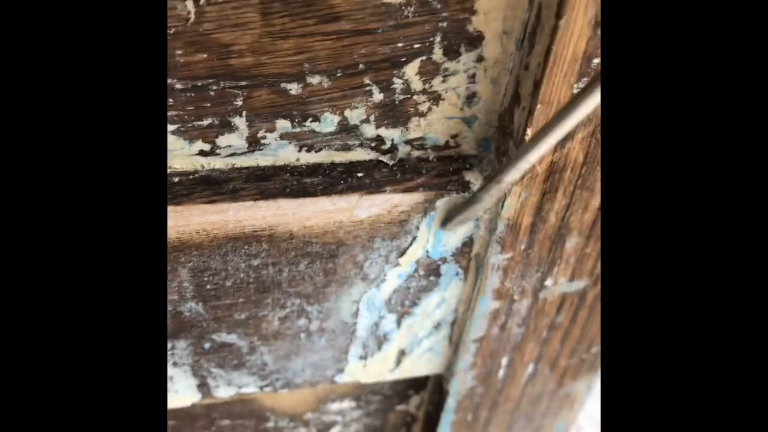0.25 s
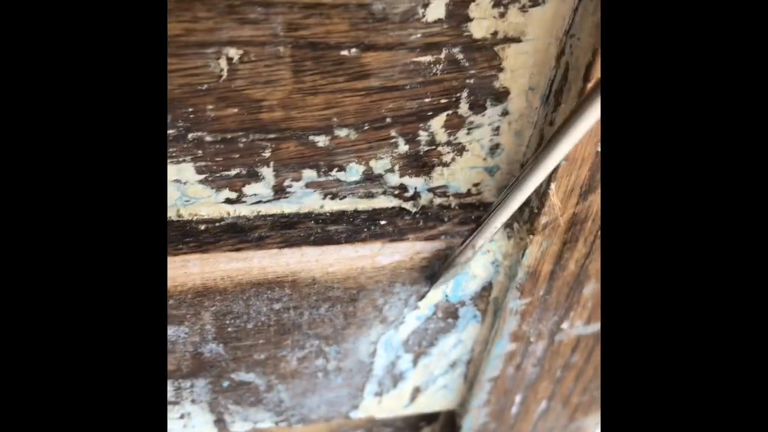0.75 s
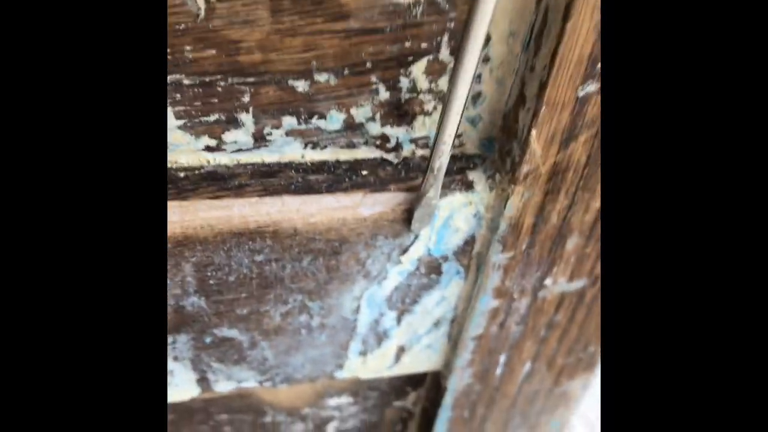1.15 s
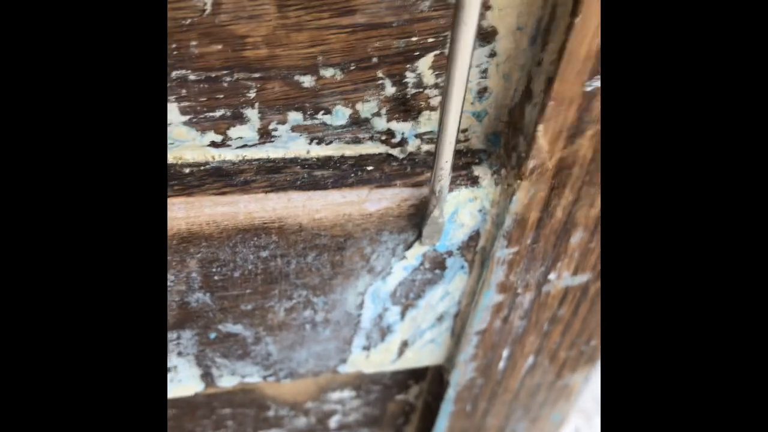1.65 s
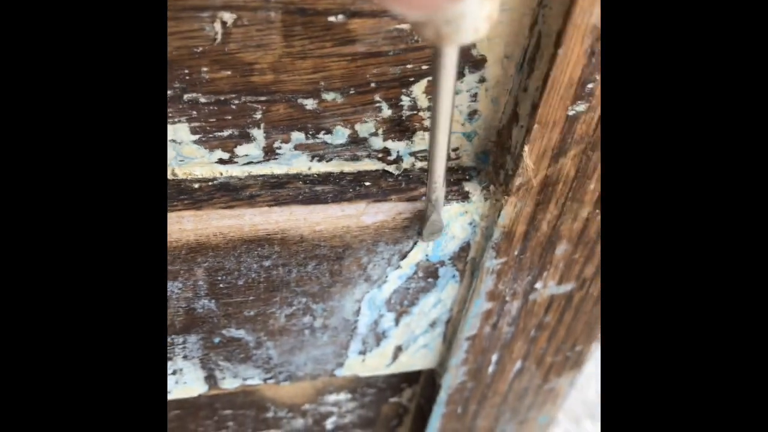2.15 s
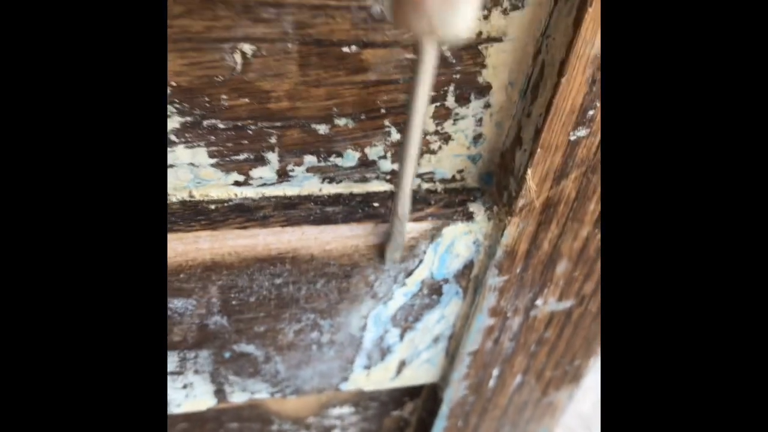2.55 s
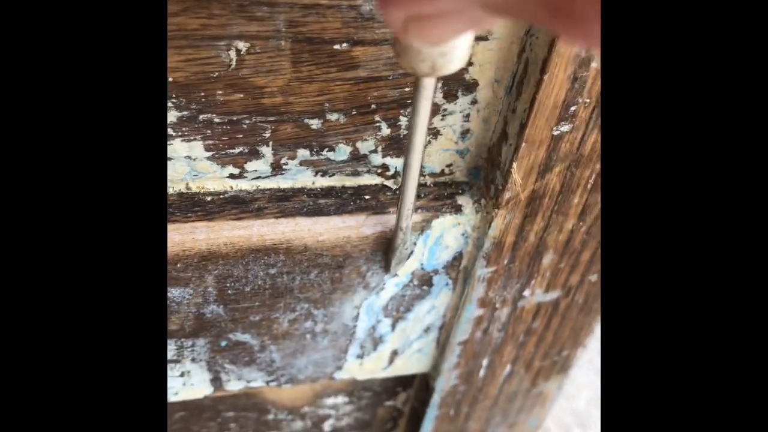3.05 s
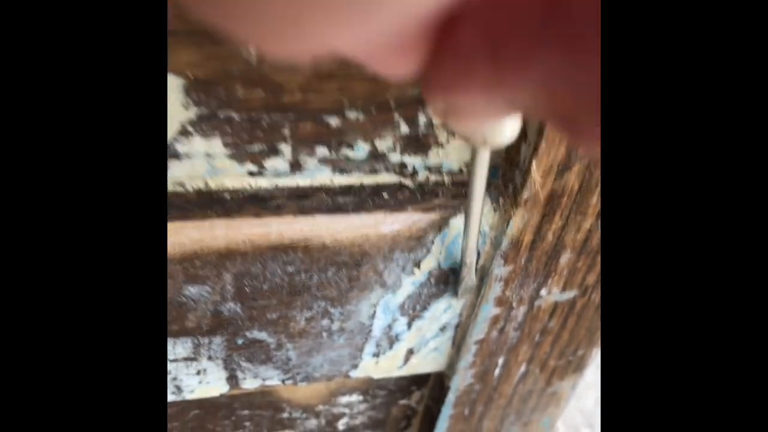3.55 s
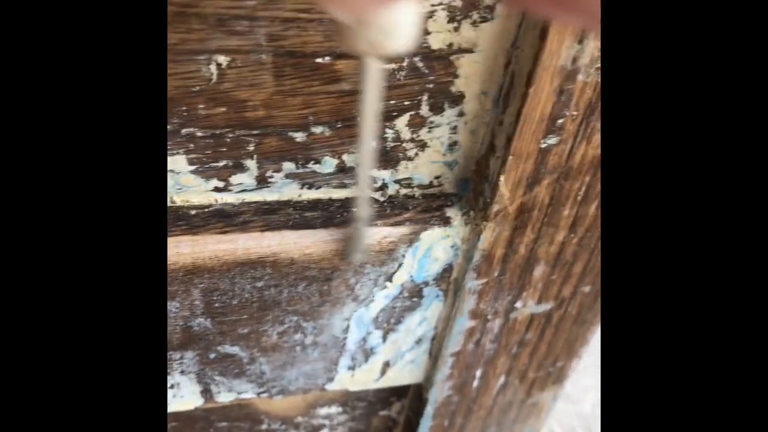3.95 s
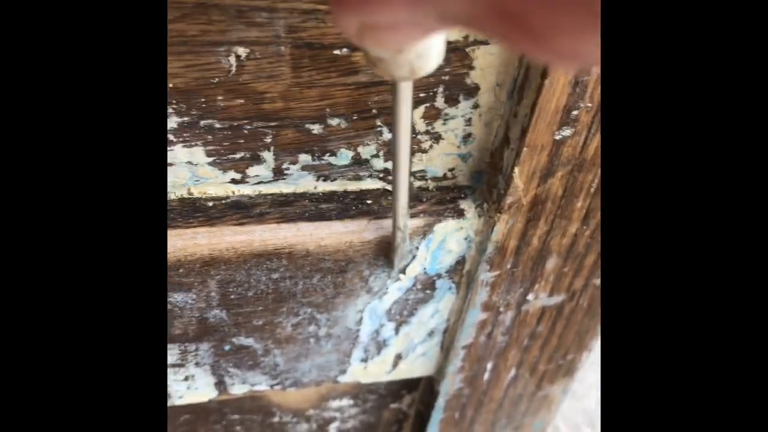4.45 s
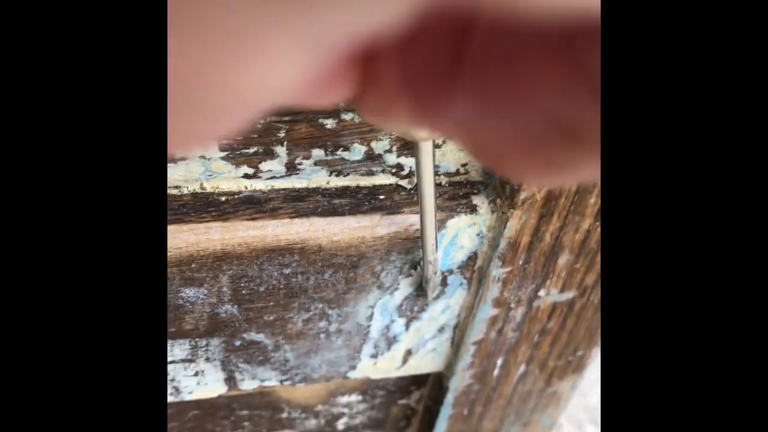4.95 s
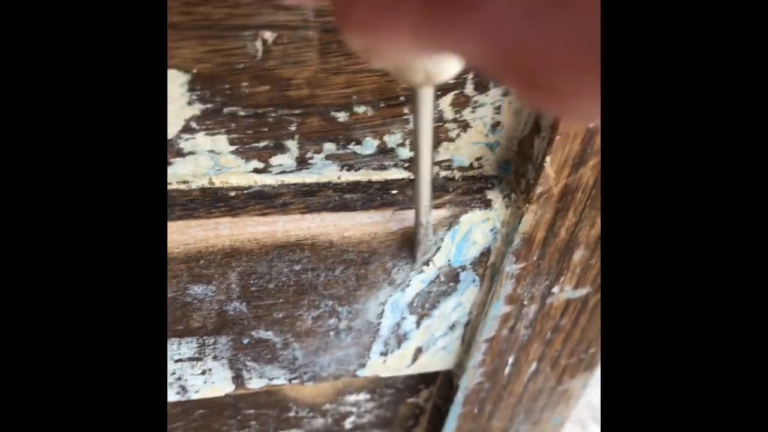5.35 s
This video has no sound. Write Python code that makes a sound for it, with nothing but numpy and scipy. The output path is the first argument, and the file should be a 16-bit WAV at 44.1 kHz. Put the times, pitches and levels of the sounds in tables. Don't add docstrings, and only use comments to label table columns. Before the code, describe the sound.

A steel point works old paint out of a wooden panel's corner, heard very close and dry with only a trace of small-room reflection. Underneath are a very faint, unsteady low motor hum, soft hiss, thin distant insects and barely audible bird chirps, the clearest near 5.1 s. At first there is a fading scrape, then tiny flake snaps at 0.3 and 0.4 s. Soft low wooden knocks come at 0.5, 0.6, 1.0 and 1.3 s, between short faint rasps; harder knocks land at 2.1 and 2.3 s, the last with a clear tick. Brittle snaps follow at 2.4 s, then lighter scratching. Around 3.4 s a thick flake breaks in two very loud, sharp cracks, the second strongest, with a soft hand bump. From 3.6 s, irregular gritty strokes and crisp snaps continue, with small pressure thumps, until a strong snap at 5.5 s and a brief fading scrape.

```python
import sys
import numpy as np
from scipy import signal
from scipy.fft import irfft
from scipy.io import wavfile

SR = 44100
rng = np.random.default_rng(int(sys.argv[2]) if len(sys.argv) > 2 else 0)


def int16_out(signal):
    q = np.round(np.clip(np.atleast_2d(signal).T, -1, 1) * 32767)
    wavfile.write(sys.argv[1], SR, q.astype(np.int16))


def gain_from_decibels(decibels):
    exponent = np.asarray(decibels, float) / 20
    return 10 ** exponent


N = 247401

# centre_hz, density_db_per_hz
ROOM_SPECTRUM = [(30, -45.5), (45, -12), (65, -4), (95, -5.5), (140, -7), (230, -9.5), (400, -16),
                 (600, -21), (1000, -26.5), (2000, -30), (4000, -34.5), (6200, -37), (9500, -39),
                 (15500, -42.5)]
# time_s, level_db
MOTOR_LOAD = [(0.0, -54.5), (0.6, -61), (0.87, -72), (1.05, -63), (1.35, -70), (1.6, -73.5), (1.97, -56.5),
              (2.28, -67), (2.58, -61), (2.86, -68.5), (3.2, -62), (3.42, -55.5), (3.7, -67.5), (4.08, -69),
              (4.3, -61), (4.9, -64), (5.15, -54.5), (5.61, -60.5)]
# start_s, length_s, first_hz, last_hz, level_db
CHIRPS = [
    (.315, .06, 2880, 2950, -73),
    (1.075, .075, 3040, 3100, -79),
    (3.085, .07, 3060, 3110, -77),
    (4.33, .045, 3070, 3120, -73),
    (5.066, .052, 2980, 3260, -63),
]
# start_s, level_db, softness_s
PUSHES = [(.01, -47.5, 0.003), (1.053, -48, 0.0037), (1.301, -47.5, 0.017), (1.708, -57.5, 0.0026),
          (1.82, -44, 0.0075), (2.011, -51.5, 0.0014), (3.187, -49.5, 0.00069), (3.215, -48.5, 0.0029),
          (3.416, -36, 0.0016), (3.446, -47, 0.0011), (3.472, -45, 0.0016), (3.509, -53.5, 0.0017),
          (4.041, -51, 0.002), (4.066, -54, 0.0014), (4.163, -50.5, 0.001), (4.189, -59, 0.0016),
          (4.879, -44.5, 0.0026), (4.905, -53.5, 0.0003), (4.937, -47, 0.00034), (4.995, -56, 0.00045),
          (4.967, -56, 0.00064), (5.515, -45.5, 0.00061), (4.99, -50.5, 0.0028), (5.579, -53, 0.0014)]
# tick_s, thud_db, centre_hz, tick_above_thud_db
KNOCKS = [
    (0.5302, -32.5, 410, -22.5),
    (.634, -30, 435, -19.5),
    (0.9588, -25, 457, -14),
    (1.279, -29, 447, -16),
    (2.1026, -21.5, 485, -16.5),
    (2.2859, -17, 485, -9.5),
]
# pitch_hz, level_db, fade_s
TICK_RINGS = [(1320, 8.5, 0.00035), (1540, -6, 0.001), (2200, -10, 0.002), (4000, -7, 0.00085),
              (5700, -32, 0.00054)]
# pitch_hz, level_db, t60_s
PANEL_MODES = [(153, -3, 0.069), (225.8, 3.5, 0.17), (274, 8, 0.042), (302, 6.5, 0.029), (394.4, -7, 0.039),
               (493.4, 2.5, 0.069), (592, -1, 0.041), (755, -5, 0.096), (938, -2.5, 0.035),
               (1054, -5.5, 0.063), (1215, -33, 0.15), (1433, -6.5, 0.034)]
# pitch_hz, level_db, t60_s
SHANK_MODES = [(1137, 11.5, 0.0096), (2085, 8, 0.013), (2400, -4.5, 0.041), (2950, 0, 0.015),
               (3345, -4, 0.032), (4440, 3, 0.013)]
# pitch_hz, level_db, t60_s
TIP_MODES = [(5330, -8.5, 0.0062), (5730, 4.5, 0.0021), (8110, 2.5, 0.0065), (9300, 3, 0.001),
             (12190, -3, 0.006), (14360, 3, 0.0015)]
# time_s, peak_db, panel_above_peak_db, dullness_0_1
SNAPS = [(0.26, -47, -16, 0.26), (0.431, -46.5, -31, 0.37), (1.1857, -59, 5.5, 0.7),
         (1.6231, -52, -30, 0.76), (1.9748, -42, -3, 0.66), (1.9959, -50, -15, 0), (2.358, -36, -2.5, 0.5),
         (2.3694, -37.5, 3, 0.17), (2.373, -45, -9, 0.4), (2.6114, -46.5, -3, 0.46), (2.721, -49.5, -17, 0),
         (3.1867, -55, -12, 0.7), (3.24, -54, -16, 0.05), (3.3536, -39, -18, 0), (3.6641, -45.5, -11, 0.1),
         (3.677, -38, -17, 0.42), (3.7167, -45.5, 3, 0.6), (3.7289, -36, -4.5, 0.45),
         (3.7992, -36, 2.5, 0.53), (3.9474, -35.5, -29, 0.5), (4.2074, -39.5, -4.5, 0.32),
         (4.3012, -37, -0.5, 0.19), (4.4416, -46, -9.5, 0.34), (4.5978, -51, -27, 0.1),
         (4.8745, -50, -10.5, 0.35), (4.9187, -38, -27, 0), (5.2874, -45.5, -10.5, 0.28),
         (5.3288, -35, -2.5, 0.46), (5.48, -58, -10, 0.1), (5.5065, -29, -6, 0.2)]
# time_s, peak_db, panel_above_peak_db, dullness_0_1, click_gain
BREAKS = [
    (3.369, -11, -16.5, .25, .4),
    (3.41, -8, -15.5, 0.31, 2.4),
]
# start_s, length_s, grit_db, panel_above_grit_db
DIGS = [
    (3.3669, 0.0024, -40, -8.5),
    (3.4047, 0.0051, -30, -15),
]
# start_s, length_s, grit_db, panel_above_grit_db
BUILDING = [(0.776, 0.026, -75, 7), (1.067, 0.12, -91.5, 20), (1.228, 0.064, -70.5, 16),
            (2.116, 0.054, -68, 12.5), (2.353, 0.041, -60, 15.5), (2.517, 0.082, -69, 13),
            (3.604, 0.044, -68.5, 3), (3.707, 0.07, -63.5, 16), (4.63, 0.079, -83, 17.5),
            (5.109, 0.048, -64, 5.5), (5.283, 0.041, -63.5, 10), (5.431, 0.026, -70, 7), ]
# start_s, length_s, grit_db, panel_above_grit_db
EVEN = [(0.268, 0.042, -76.5, 21), (0.425, 0.045, -78.5, 20.5), (0.913, 0.08, -76.5, 13),
        (1.63, 0.085, -77, 16.5), (1.76, 0.025, -81, 20), (2.71, 0.038, -67, 5.5), (2.899, 0.03, -69.5, 12),
        (3.374, 0.019, -47, 10.5), (3.665, 0.028, -65, 14.5), (3.898, 0.044, -71, 0),
        (3.951, 0.045, -61, 12.5), (4.222, 0.047, -81.5, 19.5), (4.303, 0.023, -76, 25),
        (4.587, 0.037, -72.5, 14.5), (4.731, 0.12, -74, 13.5), (4.909, 0.051, -59, 14),
        (5.478, 0.059, -60.5, 14), (5.55, 0.039, -89, 23)]
# start_s, length_s, grit_db, panel_above_grit_db
FADING = [(0, 0.052, -87.5, 26.5), (1.802, 0.052, -69.5, 5.5), (1.978, 0.024, -77, 21),
          (2.014, 0.098, -72.5, 3), (2.416, 0.023, -77.5, 17.5), (2.602, 0.026, -72, 12),
          (2.754, 0.04, -74.5, 7), (3.357, 0.027, -65, 14.5), (3.408, 0.07, -66.5, 26.5),
          (3.796, 0.05, -70.5, 17.5), (4.209, 0.017, -60, 14.5), (4.407, 0.12, -76.5, 10),
          (4.877, 0.028, -77, 24.5), (5.174, 0.053, -81.5, 19), (5.326, 0.024, -65, 24.5)]

UNEVEN_DB = 2.5


def rms_one(x):
    return x / np.sqrt(np.mean(x ** 2) + 1e-20)


def drift(rate_hz):
    r = np.exp(-2 * np.pi * rate_hz / SR)
    once = signal.lfilter([1], [1, -r], rng.standard_normal(N + SR))
    twice = signal.lfilter([1], [1, -r], once)
    return rms_one(twice[SR:])


def band(x, low_hz, high_hz):
    return signal.sosfilt(signal.butter(2, [low_hz, high_hz], "band", fs=SR, output="sos"), x)


def body(force, modes, uneven_db):
    out, energy = np.zeros(N), 0
    for k, (hz, level_db, t60_s) in enumerate(modes):
        r = gain_from_decibels(-60 / (t60_s * SR))
        w = 2 * np.pi * hz / SR
        coupling = gain_from_decibels(level_db + uneven_db * drift(37)) * (-1) ** k
        resonator = [1, -2 * r * np.cos(w), r * r]
        out += signal.lfilter([0, np.sin(w)], resonator, force * coupling + 1e-18)
        energy += gain_from_decibels(2 * level_db) / (2 - 2 * r * r)
    return out / np.sqrt(energy)


def room_hiss():
    level_db, patchy_db, settle = -66.5, 0.7, 8000
    white = rng.standard_normal((2, N + settle))
    edges_hz = 22 * 2 ** np.arange(0, 9.7, 1 / 3)
    table = np.array(ROOM_SPECTRUM)
    out = np.zeros(N)
    for k, (low, high) in enumerate(zip(edges_hz, edges_hz[1:])):
        band_db = np.interp(np.log(low * high) / 2, np.log(table[:, 0]), table[:, 1])
        noise = band(white[k % 2], low, high)[settle:]
        out += gain_from_decibels(band_db + patchy_db * drift(1.95)) * noise
    return gain_from_decibels(level_db) * out / np.std(band(out, 200, 16000))


def hum():
    motor_hz, waver_hz, rough = 61.0, 0.7, 0.7
    phase = 2 * np.pi * np.cumsum(motor_hz + waver_hz * drift(3.4)) / SR
    time_s, load_db = np.transpose(MOTOR_LOAD)
    second_db = np.interp(np.arange(N) / SR, time_s, load_db)
    first_db = -64 + 0.1 * (second_db - second_db.mean()) + drift(1.8)
    first = (1 + 1.2 * rough * drift(7.9)) * np.sin(phase)
    second = (1 + rough / 3 * drift(9.0)) * np.sin(2 * phase)
    return gain_from_decibels(first_db) * rms_one(first) + gain_from_decibels(second_db) * rms_one(second)


def insects():
    level_db, patchy_db = -78.5, 4.0
    chorus = np.zeros(N)
    for low_hz, high_hz in [(6900, 7350), (7400, 7850), (7900, 8400)]:
        chorus += band(rng.standard_normal(N), low_hz, high_hz) * gain_from_decibels(patchy_db * drift(1.7))
    return gain_from_decibels(level_db) * rms_one(chorus)


def bird():
    t60_s, echo_db = 0.6, -2.0
    calls = np.zeros(N)
    for start_s, length_s, first_hz, last_hz, level_db in CHIRPS:
        count = round(length_s * SR)
        phase = 2 * np.pi * np.cumsum(np.linspace(first_hz, last_hz, count)) / SR
        whistle = signal.windows.tukey(count, 0.5) * np.sin(phase)
        calls[round(start_s * SR):][:count] = gain_from_decibels(level_db + 1.5) * whistle
    tail = rng.standard_normal(SR // 2) * gain_from_decibels(-60 * np.arange(SR // 2) / SR / t60_s)
    echo = signal.fftconvolve(calls, tail / np.linalg.norm(tail))[:N]
    echo *= 0.35 + drift(120)
    flutter = 1 + 0.25 * drift(110)
    return calls * flutter + gain_from_decibels(echo_db) * echo


def pushes():
    t, force = np.arange(N) / SR, np.zeros(N)
    for start_s, push_db, soft_s in PUSHES:
        late = np.maximum(t - start_s, 0) / soft_s
        force += gain_from_decibels(push_db) * late * np.exp(1 - late)
    return body(force, PANEL_MODES, 3.6) + gain_from_decibels(-4) * band(force, 55, 193.8)


def knocks():
    size, lag_s, patch_db = 2048, 0.003796, -27.5
    spread, width, turn_rad = 0.063, 0.49, 0.41
    ring_share, ring_hz, sharpness = 0.54, 520, 4.7
    half, out = size // 2, np.zeros(N)
    hz = np.maximum(np.arange(half + 1) * SR / size, 1)
    late = np.arange(-half, half) / SR
    after = late.clip(0)
    rings = 1 + ring_share / (1 + 1j * sharpness * (hz / ring_hz - ring_hz / hz))
    tick = np.zeros(size)
    for tick_hz, level_db, fade_s in TICK_RINGS:
        tick += gain_from_decibels(level_db) * np.sin(2 * np.pi * tick_hz * late) * np.exp(-after / fade_s)
    tick *= 1 - np.exp(-after / 0.0001)
    patches = band(rng.standard_normal((len(KNOCKS), size)), 350, 860)
    for (tick_s, thud_db, centre_hz, tick_db), patch in zip(KNOCKS, patches):
        ahead = 4 * np.pi * spread * (np.sqrt(hz) - (hz + centre_hz) / 2 / np.sqrt(centre_hz))
        phase = ahead + turn_rad + 2 * np.pi * hz * lag_s
        spectrum = np.exp(-0.5 * (np.log(hz / centre_hz) / width) ** 2 - 1j * phase)
        thud = irfft(rings * spectrum)
        wave = -np.roll(thud, half) / np.abs(thud).max()
        wave -= gain_from_decibels(tick_db) * tick
        wave += gain_from_decibels(patch_db) * rms_one(patch) * np.exp(-((late - lag_s) / 0.01) ** 8)
        out[round(tick_s * SR) - half:][:size] += gain_from_decibels(thud_db) * wave
    return out + gain_from_decibels(-33.0) * body(out, PANEL_MODES, UNEVEN_DB)


def snaps():
    crackle_s, snap_click = 0.001, 0.36
    sharp, dull, release, knock = np.zeros((4, N))
    late = np.arange(-500, 300) / SR
    swell = np.exp(np.minimum(0.88 * late, -late) / crackle_s)
    events = [(*row, snap_click) for row in SNAPS] + [tuple(row) for row in BREAKS]
    for time_s, peak_db, panel_db, dullness, click in events:
        burst = gain_from_decibels(peak_db) * 0.68 * rng.standard_normal(800) * swell
        at = round(time_s * SR + 12)
        sharp[at - 500:at + 300] += (1 - dullness) * burst
        dull[at - 500:at + 300] += dullness * burst
        release[at] += gain_from_decibels(peak_db) * click
        knock[at] += gain_from_decibels(peak_db + panel_db)
    tip = gain_from_decibels(-2.5) * body(sharp, TIP_MODES, UNEVEN_DB) + gain_from_decibels(-7.5) * band(sharp, 1700, 15000)
    shank = gain_from_decibels(-8.5) * body(dull, SHANK_MODES, UNEVEN_DB) + gain_from_decibels(11) * band(dull, 950, 4400)
    crack = gain_from_decibels(1) * band(release, 900, 6400) + gain_from_decibels(1.0) * body(release, SHANK_MODES, UNEVEN_DB)
    crack += gain_from_decibels(8.5) * band(release, 2150, 2620) + gain_from_decibels(3.0) * band(release, 7700, 8500)
    crack += gain_from_decibels(9) * body(knock, SHANK_MODES[:3], UNEVEN_DB)
    hard = band(knock, 408, 4500)
    return tip + shank + crack + gain_from_decibels(25.0) * body(hard, PANEL_MODES, UNEVEN_DB)


def slips(per_s, size_db):
    sizes = gain_from_decibels(size_db * np.minimum(rng.exponential(1, N), 4.2)) * rng.choice([-1, 1], N)
    return rms_one(sizes * (rng.random(N) < per_s / SR))


def stroke_forces():
    t, force = np.arange(N) / SR, np.zeros((3, N))
    kinds = [(BUILDING, 10, 0), (EVEN, 0, 0), (FADING, -5.5, -0.45), (DIGS, 10, 0)]
    for rows, base_db, per_depth in kinds:
        for start_s, length_s, grit_db, panel_db in rows:
            swell_db = base_db + per_depth * panel_db
            shank_db = 9.5 + 7 * (np.tanh((panel_db - 10) / 7.5) - 1)
            edge_s = 0.00091 + 0.15 * length_s
            first = max(round((start_s - 5 * edge_s) * SR), 0)
            on = slice(first, round((start_s + length_s + 8 * edge_s) * SR))
            late = t[on] - start_s
            rise = np.minimum(late, 0) * 1.5 / edge_s
            fall = np.maximum(late - length_s, 0) / edge_s
            swell = gain_from_decibels(grit_db + swell_db * (np.clip(late / length_s, 0, 1) - 0.5))
            force[:, on] += np.exp(rise - fall) * swell * gain_from_decibels([[0], [shank_db], [panel_db]])
    return force * gain_from_decibels(0.55 * drift(110))


def strokes():
    force = stroke_forces()
    coarse = slips(1500, 3.44) * force
    fine = slips(6000, 2.6) * force
    tip = gain_from_decibels(-4.5) * body(coarse[0], TIP_MODES, 2.5)
    grit = gain_from_decibels(1.5) * band(fine[0] * gain_from_decibels(2.0 * drift(220)), 2620, 12000)
    shank = gain_from_decibels(-2.5) * body(coarse[1], SHANK_MODES, 3.0) + gain_from_decibels(6) * band(fine[1], 1000, 4400)
    panel = gain_from_decibels(-1.0) * body(band(coarse[2], 230, 3250), PANEL_MODES, UNEVEN_DB)
    panel += gain_from_decibels(7.5) * band(fine[2], 300, 710)
    return tip + grit + shank + panel


def scene():
    background = room_hiss() + hum() + insects() + bird()
    work = pushes() + knocks() + snaps() + strokes()
    t60_s, count = 0.1, SR // 4
    tail = band(rng.standard_normal(count), 150, 4400) * gain_from_decibels(-60 * np.arange(count) / SR / t60_s)
    echo = signal.fftconvolve(work, tail / np.linalg.norm(tail))[:N]
    return (background + work + gain_from_decibels(-36.5) * echo)[None]


def top_cut(x):
    return signal.sosfilt(signal.butter(12, 16500, fs=SR, output="sos"), x)


def record(dry):
    mix = signal.sosfilt(signal.butter(6, 45, "high", fs=SR, output="sos"), dry)
    mix = signal.sosfilt(signal.ellip(10, 0.5, 62, 15750, fs=SR, output="sos"), mix)
    return top_cut(mix)


dry = scene()
out = record(dry)
int16_out(out)
```